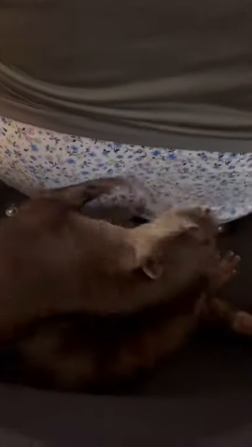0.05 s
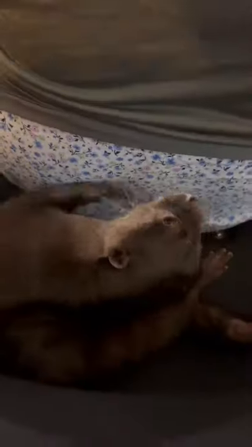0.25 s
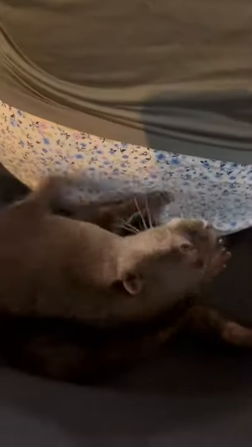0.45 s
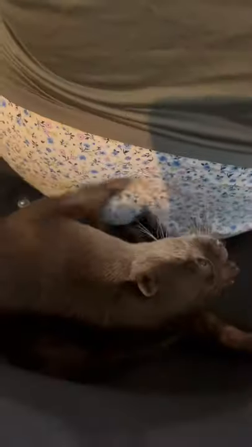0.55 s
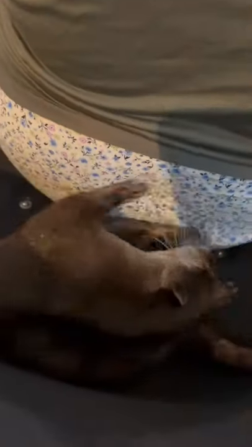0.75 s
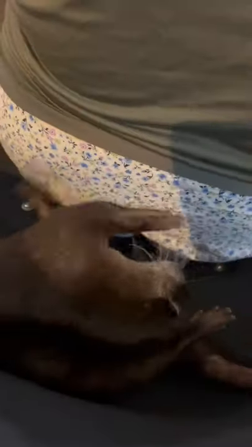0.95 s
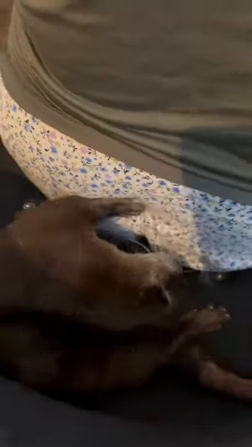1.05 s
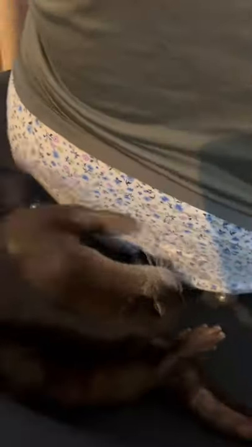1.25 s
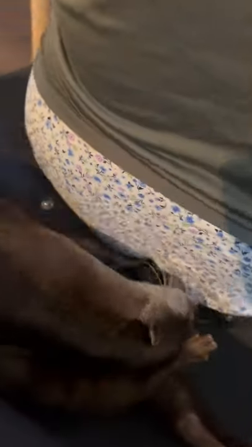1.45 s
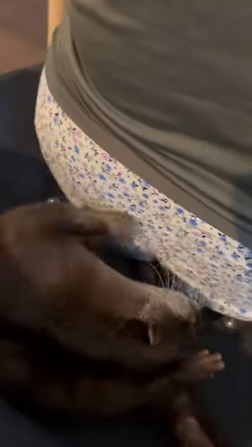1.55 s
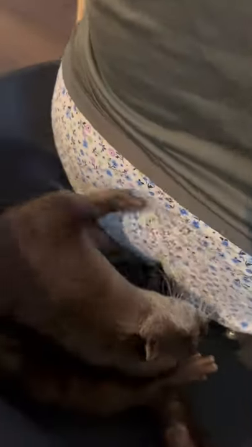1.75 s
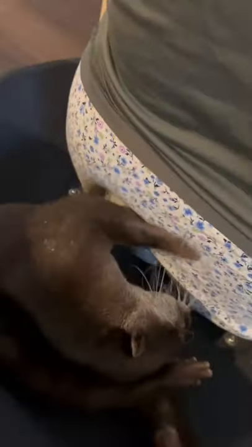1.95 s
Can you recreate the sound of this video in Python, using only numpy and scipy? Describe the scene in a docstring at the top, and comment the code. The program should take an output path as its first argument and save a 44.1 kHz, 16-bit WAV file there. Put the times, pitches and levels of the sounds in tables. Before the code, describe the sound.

One loud, nasal otter squeal, close up, with faint paw strokes on cloth in a quiet room

```python
"""Over a quiet hiss, a faint paw stroke on cloth; then one loud, nasal otter squeal close to the microphone.
The call starts raspy, breaks into a short growl and settles on a clear, slightly falling note: summed
partials shaped by the throat, plus air puffs, two beating low tones, a last hum and a short room tail.
Quick, faint strokes go on: noise swells with a rising resonance. Later the cloth scuffs (grainy noise)
and the cushion under the animal rumbles (low noise and damped bumps) as it shifts."""
import sys
import numpy as np
from scipy import signal
from scipy.fft import rfft, irfft
from scipy.io import wavfile

SR = 44100
rng = np.random.default_rng(int(sys.argv[2]) if len(sys.argv) > 2 else 0)


def pcm_store(signal):
    """Save signal as 16-bit PCM."""
    levels = np.round(np.clip(np.atleast_2d(signal), -1, 1) * 32767)
    wavfile.write(sys.argv[1], SR, levels.astype(np.int16).T)


N = 88200
TIME_S = np.arange(N) / SR
BIN_HZ = np.fft.rfftfreq(N, 1 / SR)

# correlation of the two ports for diffuse sound: freq_hz, likeness (-1 to 1)
PORT_LIKENESS = [(60, 1), (250, 0.81), (700, -0.53), (2000, -0.33), (4000, 0.057), (7000, 1),
                 (10000, -0.15), (12500, -0.89)]

# steady room hiss: freq_hz, relative_db
HISS_SPECTRUM = [(50, 7.5), (400, 3), (1000, -12), (2200, -7.5), (3300, -1.5), (5000, -5.5), (7500, -7),
                 (12000, -4), (14000, -28)]
HISS_DB = -74

# cushion rumble level: time_s, level_db
RUMBLE_LEVEL_CURVE = [(0, -71), (.7, -64.5), (1.0, -66.5), (1.35, -64.5), (1.58, -56), (1.68, -57.5),
                      (1.8, -55), (2, -57)]
# cushion rumble colour: freq_hz, relative_db
RUMBLE_SPECTRUM = [(20, -5.5), (45, -17.5), (70, 0), (95, -7.5), (125, -3.5), (165, -6.5), (220, -8),
                   (400, -13), (800, -13), (2000, -21.5), (8000, -51.5)]
# soft bumps on the cushion: start_s, pitch_hz, level_db
CUSHION_BUMPS = [(.155, 121.1, -61), (0.743, 65, -62.5), (0.913, 66.6, -57), (1.564, 340, -59),
                 (1.741, 71.7, -54)]
BUMP_PEAK_S = 0.017

# scuffs as the body shifts: start_s, length_s, level_db, hollow_db (re cloth)
CLOTH_SCUFFS = [(1.447, 0.048, -53, -10), (1.512, 0.052, -65, -2), (1.545, 0.069, -60.5, 4.5),
                (1.693, .095, -51.5, -6.5), (1.884, 0.071, -60.5, -6)]
# scuff colour: freq_hz, relative_db
SCUFF_SPECTRUM = [(100, -20.5), (300, -14), (480, -14), (750, 1), (1400, -4), (1900, 1), (2800, -3.5),
                  (3350, 0.5), (4000, -2.5), (6000, -10.5), (9000, -18), (13000, -19)]
# claw ticks: time_s, level_db
CLAW_TICKS = [(1.467, -47), (1.714, -43.5)]
SCUFF_RISE_S, SCUFF_FALL_S, TICK_S = .011, .028, 0.0012
GRAINS_PER_S, GRAIN_SHARE = 1100, .5
LUMP_RMS_DB, LUMP_HZ = 0.5, 69.6
HOLLOW_HZ, HOLLOW_POLE_WIDTH_HZ = 660, 114

# paw strokes on cloth: end_s, swell_s, level_db, lead_in_db (re swell), zip_db (re rub)
PAW_STROKES = [(.112, 0.056, -57.5, -45.5, -13), (0.613, 0.051, -56.5, -2, -6.5),
               (0.811, 0.033, -55.5, -8, -14), (0.95, 0.1, -60.5, -4, -6), (1.121, 0.045, -55, -11, -5.5),
               (1.25, .055, -55.5, -6, -14), (1.427, 0.04, -52, -11, -11.5), (1.609, 0.036, -54.5, -4, -8),
               (1.801, 0.035, -45.5, -13, -18), (1.967, 0.061, -54, -4, -6.5)]
# stroke colour: freq_hz, relative_db
RUB_SPECTRUM = [(200, -10), (1000, -31.5), (2300, -5), (3500, -0.5), (5000, -6), (7000, -2), (8500, -2.5),
                (10300, -6.5), (12000, 2), (14000, -1)]
LEAD_IN_S, STOP_S = 0.17, 0.0045
ZIP_FROM_HZ, ZIP_TO_HZ, ZIP_S, ZIP_POLE_WIDTH_HZ = 3300, 7970, 0.0083, 900

# room decay: freq_hz, t60_s
ROOM_DECAY = [(150, 0.23), (1000, 0.52), (2700, 0.65), (5000, 0.74), (10000, 0.27)]
TAIL_DB, TAIL_RISE_S = -23.5, 0.0047
EARLY_DB, EARLY_START_S, EARLY_20DB_S = -13, .002, .04  # early part falls 20 dB per 40 ms

# call level difference, left minus right: freq_hz, balance_db
PORT_BALANCE_DB = [(200, -3), (500, 5), (800, 21.5), (1100, 11.5), (1550, 3.5), (1900, -8), (2600, -1.5),
                   (3100, -1), (6000, 0)]
# call phase, left ahead of right: freq_hz, lead_rad
PORT_LEAD_RAD = [(150, 0), (340, 1.3), (860, 2.5), (1460, 4), (2000, 5), (2700, 5.5), (3790, 4.5),
                 (4650, 8.5), (5600, 7), (7500, 5), (10200, 5), (11300, 4), (12500, 2.5)]

# hum of the folds as the mouth shuts: centre_s, pitch_hz, level_db, length_s
RELEASE_HUM = (.503, 445, -58, .02)

# growl level: time_s, level_db
GROWL_LEVEL = [(.22, -65.5), (.25, -62.5), (.295, -62), (.308, -43), (.322, -60.5), (.335, -43),
               (.362, -39), (.38, -59.5), (.41, -58.5), (.45, -60), (.5, -78)]
# beating growl tones: pitch_hz, relative_db
BEATING_TONES = [(236, -0.5), (295, -1)]
GROWL_WANDER, GROWL_WANDER_HZ = 0.057, 60  # rms fraction of pitch, rate

# call pitch: time_s, pitch_hz
CALL_PITCH = [(.215, 565), (.229, 553.3), (.243, 596.7), (.257, 616.2), (.265, 573), (.272, 509.2),
              (.278, 500.4), (.285, 597.4), (.292, 618), (.297, 452.8), (.305, 545), (.313, 607.7),
              (.33, 517.9), (.36, 519.5), (.373, 550.7), (.387, 529), (.397, 568), (.418, 553),
              (.438, 522.5), (.454, 531.6), (.482, 524.5), (.495, 473)]
# call effort: time_s, level_db
CALL_EFFORT = [(.216, -59.5), (.224, -35), (.238, -25.5), (.255, -25), (.27, -25), (.295, -25.5),
               (.312, -28), (.319, -36), (.329, -29), (.337, -34.5), (.348, -24), (.353, -40.5),
               (.358, -30), (.372, -26), (.425, -25.5), (.46, -22.5), (.48, -26.5), (.488, -41.5),
               (.505, -52)]
# vocal folds: time_s, roughness (0-1), period_doubling (0-1)
FOLD_STATE = [(.22, 0.25, 0), (.25, 0.3, 0.37), (.275, 0.29, 0), (.29, .25, 0), (.315, 0.6, 0.5),
              (.33, 0.94, .55), (.355, 0.9, 0.65), (.372, 0.3, 0.1), (.4, 0.06, 0.02), (.44, 0, 0),
              (.49, .07, 0)]
# mouth opening: time_s, throat_resonance_scale
MOUTH_SCALE = [(.22, 0.92), (.27, .92), (.3, 0.99), (.4, 0.941), (.45, 0.97), (.49, 0.94)]
# slope above BRIGHT_HZ: time_s, slope_db_per_octave
BRIGHT_SLOPE = [(.22, -16.5), (.245, -5.5), (.275, -1.5), (.35, 0), (.39, 0.5), (.45, 1.5), (.49, -1.5)]
BRIGHT_HZ = 2800
# gain around an upper mouth resonance: time_s, gain_db
UPPER_GAIN = [(.22, 0), (.3, -6), (.35, -6), (.39, 4.5), (.425, -15.5), (.448, 15), (.48, 3)]
UPPER_HZ, UPPER_HALF_WIDTH_HZ = 3510, 220
# voice gain below LOWS_HZ: time_s, gain_db
LOWS_GAIN = [(.22, -1.5), (.3, 0), (.345, 5.5), (.38, -2), (.42, -2), (.45, -5.5), (.48, 1.5)]
LOWS_HZ = 900
# throat and mouth: freq_hz, relative_db
THROAT_SPECTRUM = [(150, -60.5), (430, -37), (580, -18.5), (800, -10.5), (1100, -6.5), (1300, -7.5),
                   (1550, -15), (1800, -19), (2200, -7.5), (2650, 2.5), (3150, -6), (3750, -6.5),
                   (4300, -11.5), (4600, -21.5), (4850, -18.5), (5150, -28.5), (5600, -33), (6000, -23),
                   (6400, -12.5), (7000, -25), (8300, -23), (9200, -39.5), (9800, -32.5), (11200, -33.5),
                   (12500, -43)]
# resonances that delay the partials, so each pulse rings on: centre_hz, half_width_hz
RINGING_POLES = [(1100, 260), (2350, 320), (2750, 300), (3650, 420), (6200, 400)]
JITTER, SHIMMER, FLUTTER_HZ = .045, .3, 200  # rms fractions at full roughness, rate
BREATH = .45  # puff level re voice at full roughness
SCATTER_CYCLES, ROUGH_SCATTER_CYCLES, SCATTER_HZ = .0045, .03, 300  # always, added by roughness, rate

EDGE_HZ = 12600


def amp(db):
    """Decibels to gain."""
    return 10 ** (np.asarray(db) / 20)


def unit(x):
    """Scales to rms 1."""
    return x / np.sqrt(np.mean(x ** 2) + 1e-20)


def curve(rows):
    """Each column of a time table, at every sample."""
    time_s, *columns = np.transpose(rows)
    return np.squeeze([np.interp(TIME_S, time_s, column) for column in columns])


def read(points, hz):
    """A spectrum table on a log-frequency axis."""
    freq_hz, value = np.transpose(points)
    return np.interp(np.log(hz + 1), np.log(freq_hz), value)


def colour(x, points):
    """Filters by a spectrum table, keeping the level of white noise."""
    gain = amp(read(points, BIN_HZ))
    return irfft(rfft(x) * unit(gain), N)


def wander(rate_hz):
    """Smooth random motion of rms 1: noise low-passed near rate_hz."""
    spectrum = rfft(rng.standard_normal(N))
    return unit(irfft(spectrum / (1 + (BIN_HZ / rate_hz) ** 4), N))


def spread(pair):
    """Makes two unrelated signals partly alike, as the two ports hear diffuse sound."""
    a, b = rfft(pair)
    likeness = np.clip(read(PORT_LIKENESS, BIN_HZ), -1, 1)
    mid = a * np.sqrt((1 + likeness) / 2)
    side = b * np.sqrt((1 - likeness) / 2)
    return irfft(np.array([mid + side, mid - side]), N)


def noise():
    """White noise at both ports."""
    return spread(rng.standard_normal((2, N)))


def resonate(x, hz, pole_width_hz):
    """Shifts hz to zero, smooths with a double pole and shifts back: a resonance that follows hz."""
    turn = np.exp(2j * np.pi * np.cumsum(hz) / SR)
    r = np.exp(-np.pi * pole_width_hz / SR)
    smooth = signal.lfilter([(1 - r) ** 2], [1, -2 * r, r * r], x / turn)
    return (turn * smooth).real


def hiss():
    """Steady coloured noise of the quiet room."""
    return amp(HISS_DB) * colour(noise(), HISS_SPECTRUM)


def cushion():
    """Low rumble noise and damped-sine bumps as the animal moves."""
    out = unit(colour(noise(), RUMBLE_SPECTRUM)) * amp(curve(RUMBLE_LEVEL_CURVE))
    for start_s, pitch_hz, level_db in CUSHION_BUMPS:
        t = np.maximum(TIME_S - start_s, 0)
        envelope = t / BUMP_PEAK_S * np.exp(1 - t / BUMP_PEAK_S)
        out = out + amp(level_db) * envelope * np.sin(2 * np.pi * pitch_hz * t)
    return out


def scuffs():
    """Grainy friction of fur on cloth stirs a hollow resonance; a claw catches now and then."""
    lumps = amp(LUMP_RMS_DB * wander(LUMP_HZ))
    hits = rng.random((2, N)) < GRAINS_PER_S / SR
    grains = unit(spread(rng.standard_normal((2, N)) * hits))
    rub = unit(GRAIN_SHARE * grains + (1 - GRAIN_SHARE) * noise())
    cloth = colour(rub, SCUFF_SPECTRUM)
    hollow = unit(resonate(rub, np.full(N, HOLLOW_HZ), HOLLOW_POLE_WIDTH_HZ))
    ticks = sum(amp(level_db) * np.exp(-abs(TIME_S - time_s) / TICK_S) for time_s, level_db in CLAW_TICKS)
    out = colour(noise(), SCUFF_SPECTRUM) * ticks
    for start_s, length_s, level_db, hollow_db in CLOTH_SCUFFS:
        rise = np.clip((TIME_S - start_s) / SCUFF_RISE_S, 0, 1)
        fall = np.exp(-np.maximum(TIME_S - start_s - length_s, 0) / SCUFF_FALL_S)
        out = out + amp(level_db) * rise * fall * lumps * (cloth + amp(hollow_db) * hollow)
    return out


def strokes():
    """Each stroke swells and stops short; the weave zips upward as the paw speeds off it."""
    rub = colour(noise(), RUB_SPECTRUM)
    out = np.zeros((2, N))
    # time left to the nearest stroke end; the zip stays at its top for 30 ms after it
    to_end_s = np.min([np.where(TIME_S < row[0] + .03, np.maximum(row[0] - TIME_S, 0), 1)
                       for row in PAW_STROKES], 0)
    zip_hz = ZIP_FROM_HZ + (ZIP_TO_HZ - ZIP_FROM_HZ) * np.exp(-to_end_s / ZIP_S)
    weave = unit(resonate(noise(), zip_hz, ZIP_POLE_WIDTH_HZ))
    for end_s, swell_s, level_db, lead_in_db, zip_db in PAW_STROKES:
        before_s = np.maximum(end_s - TIME_S, 0)
        after_s = np.maximum(TIME_S - end_s, 0)
        swell = np.exp(-(before_s / swell_s) ** 4)
        lead_in = amp(lead_in_db) * np.exp(-(before_s / LEAD_IN_S) ** 4)
        shape = (swell + lead_in) / (1 + amp(lead_in_db)) * np.exp(-after_s / STOP_S)
        out += amp(level_db) * shape * (rub + amp(zip_db) * weave)
    return out


def room(x):
    """Dense early reflections and a soft tail: noise decaying at its own rate in each band."""
    hz, t, bands = signal.stft(rng.standard_normal((2, SR)), SR, nperseg=256)
    decay = amp(-60 * t / read(ROOM_DECAY, hz)[:, None])
    tail = signal.istft(bands * decay, SR, nperseg=256)[1][:, :SR]
    t = TIME_S[:SR]
    tail = tail * np.minimum(t / TAIL_RISE_S, 1)
    early = rng.standard_normal((2, SR)) * amp(-20 * t / EARLY_20DB_S) * (t > EARLY_START_S)
    echo = amp(TAIL_DB) * tail / np.linalg.norm(tail) + amp(EARLY_DB) * early / np.linalg.norm(early)
    echo = np.sqrt(2) * echo  # norms span both ports
    return signal.fftconvolve(x[None], echo, axes=1)[:, :N]


def ports(x):
    """The close call reaches the two ports with different level and phase."""
    half = amp(read(PORT_BALANCE_DB, BIN_HZ) / 2)
    lead = np.exp(1j * read(PORT_LEAD_RAD, BIN_HZ))
    return irfft(rfft(x) * np.array([half, lead.conj() / half]), N)


def release():
    """The folds hum on briefly as the mouth shuts: a sine under a bell-shaped envelope."""
    centre_s, pitch_hz, level_db, length_s = RELEASE_HUM
    envelope = np.exp(-((TIME_S - centre_s) / length_s) ** 2)
    return amp(level_db) * envelope * np.sin(2 * np.pi * pitch_hz * TIME_S)


def growl():
    """Two low, unsteady tones beat against each other, loudest where the voice breaks."""
    tones = np.zeros(N)
    for pitch_hz, relative_db in BEATING_TONES:
        unsteady_hz = pitch_hz * (1 + GROWL_WANDER * wander(GROWL_WANDER_HZ))
        tones += amp(relative_db) * np.sin(2 * np.pi * np.cumsum(unsteady_hz) / SR)
    on = (TIME_S > GROWL_LEVEL[0][0]) & (TIME_S < GROWL_LEVEL[-1][0])
    return unit(tones) * amp(curve(GROWL_LEVEL)) * on


def squeal():
    """Jittering fold pulses, with half lines and puffs of air when rough, shaped by the throat."""
    rough, doubling = np.clip(curve(FOLD_STATE), 0, 1)
    pitch_hz, mouth, slope_db = map(curve, (CALL_PITCH, MOUTH_SCALE, BRIGHT_SLOPE))
    upper_db, lows_db = map(curve, (UPPER_GAIN, LOWS_GAIN))
    cycles = np.cumsum(pitch_hz * (1 + JITTER * rough * wander(FLUTTER_HZ))) / SR
    cycles = cycles + (SCATTER_CYCLES + ROUGH_SCATTER_CYCLES * rough) * wander(SCATTER_HZ)
    on = (TIME_S > CALL_EFFORT[0][0]) & (TIME_S < CALL_EFFORT[-1][0])
    voice = np.zeros(N)
    power = np.full(N, 1e-12)
    for k in np.arange(2, 43) / 2:  # harmonics 1 to 21 and the half lines between
        hz = k * pitch_hz[on]
        octaves_up = np.log2(np.maximum(hz / BRIGHT_HZ, 1))
        gain = amp(read(THROAT_SPECTRUM, hz / mouth[on]) + slope_db[on] * octaves_up)
        gain = gain * amp(upper_db[on] * np.exp(-((hz - UPPER_HZ) / UPPER_HALF_WIDTH_HZ) ** 2))
        gain = gain * amp(lows_db[on] / (1 + (hz / LOWS_HZ) ** 8))
        gain = gain * (doubling[on] if k % 1 else 1)
        lag_rad = sum(2 * np.arctan((hz - centre_hz * mouth[on]) / half_width_hz)
                      for centre_hz, half_width_hz in RINGING_POLES)
        voice[on] += gain * np.cos(2 * np.pi * k * cycles[on] - lag_rad + np.pi * (k % 1))
        power[on] += gain ** 2 / 2
    # level out the partials, so effort alone sets the loudness
    voice *= (1 + SHIMMER * rough * wander(FLUTTER_HZ)) / np.sqrt(power)
    puff_shape = 0.097 + np.exp(-(cycles % 1) / 0.37)  # decays within each cycle
    puffs = unit(colour(rng.standard_normal(N) * puff_shape, THROAT_SPECTRUM))
    mix = voice + BREATH * rough * puffs
    mix = mix / np.sqrt(1 + (SHIMMER ** 2 + BREATH ** 2) * rough ** 2)
    return mix * amp(curve(CALL_EFFORT)) * on


def scene():
    """The call and its room, over the cloth sounds and a faint hiss."""
    background = hiss() + cushion() + scuffs() + strokes()
    call = release() + growl() + squeal()
    return background + spread(room(call)) + ports(call)


def record(dry):
    """Band limit: a linear-phase low-pass at EDGE_HZ."""
    low_pass = signal.firwin(255, EDGE_HZ, window=("kaiser", 8), fs=SR)
    return signal.oaconvolve(dry, low_pass[None], "same")


dry = scene()
out = record(dry)
pcm_store(out)
```